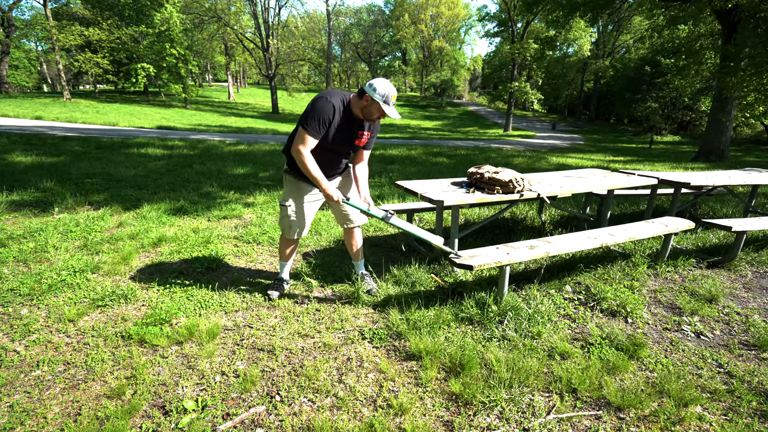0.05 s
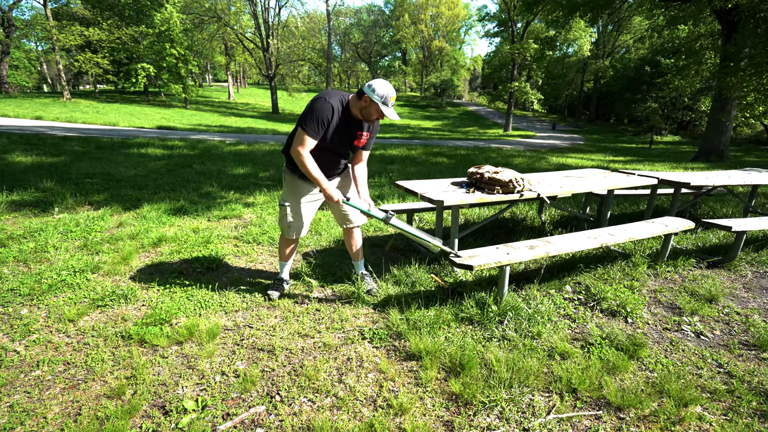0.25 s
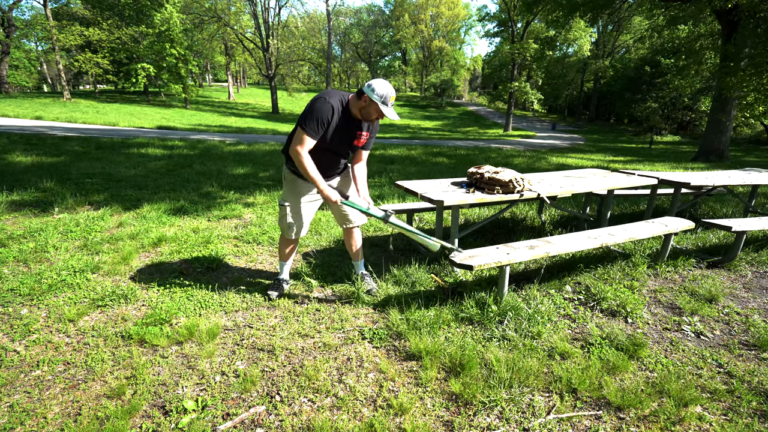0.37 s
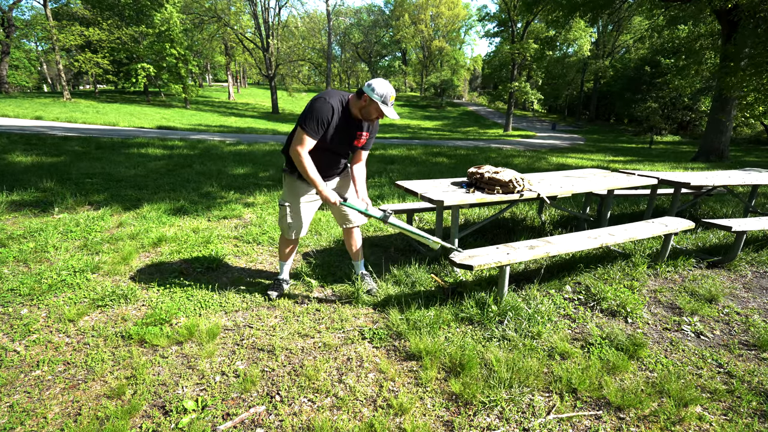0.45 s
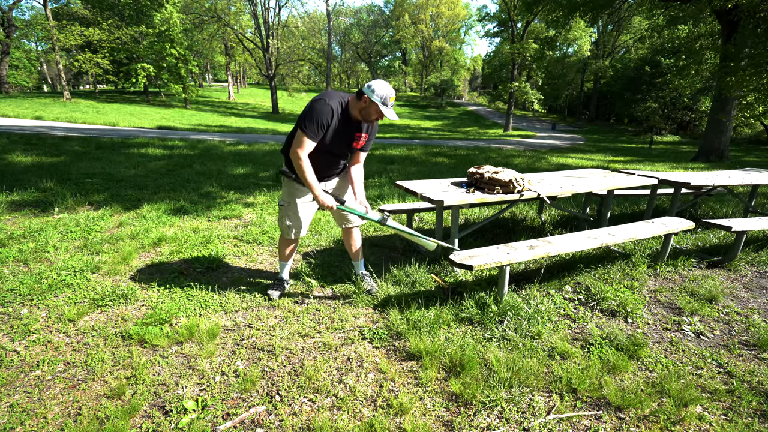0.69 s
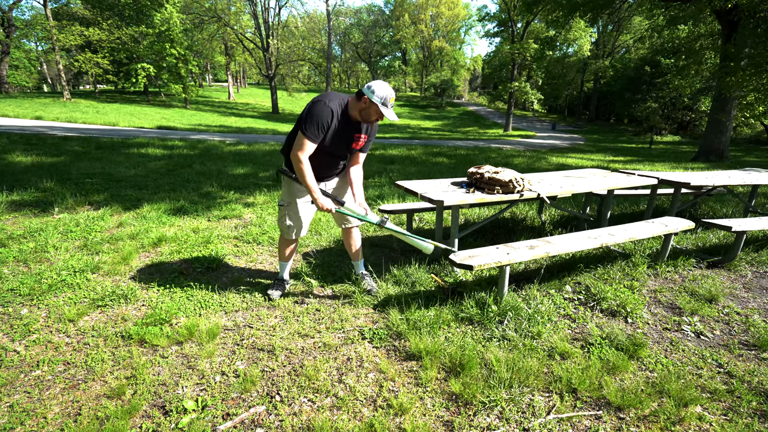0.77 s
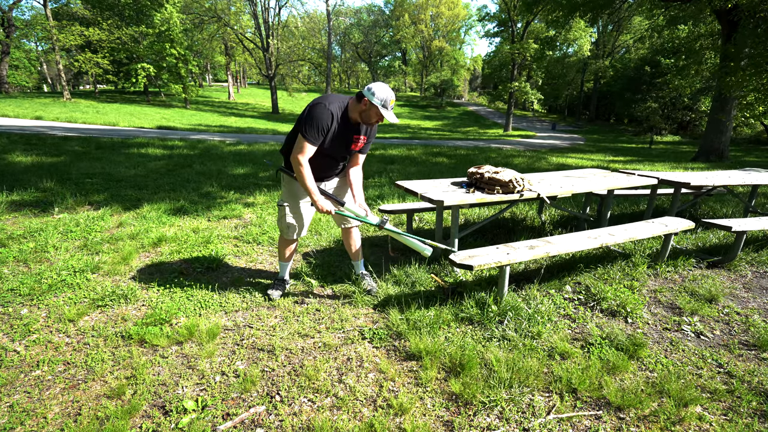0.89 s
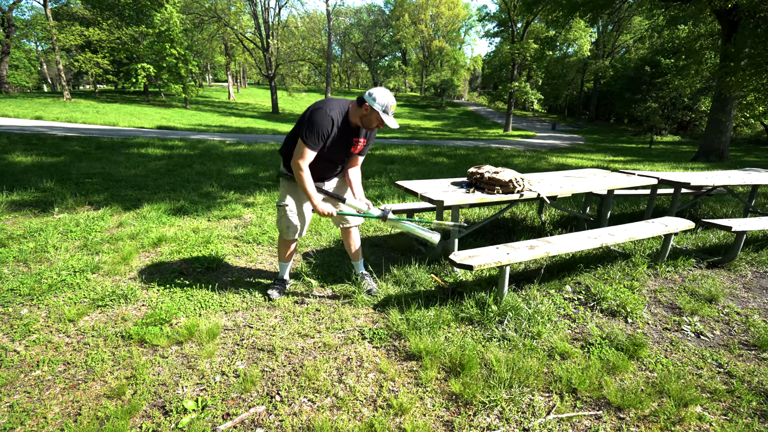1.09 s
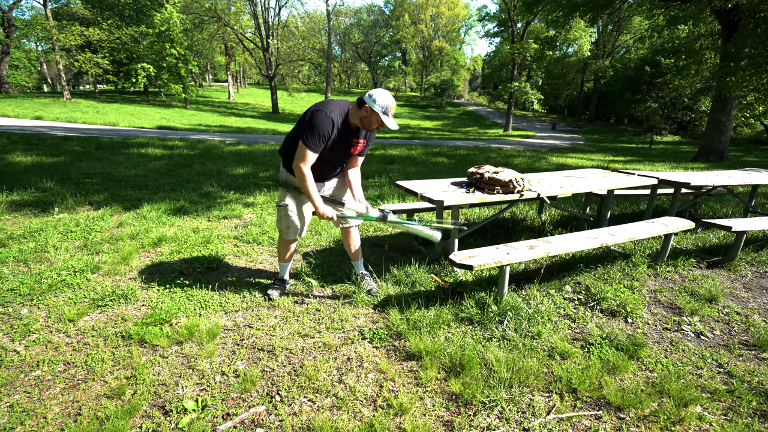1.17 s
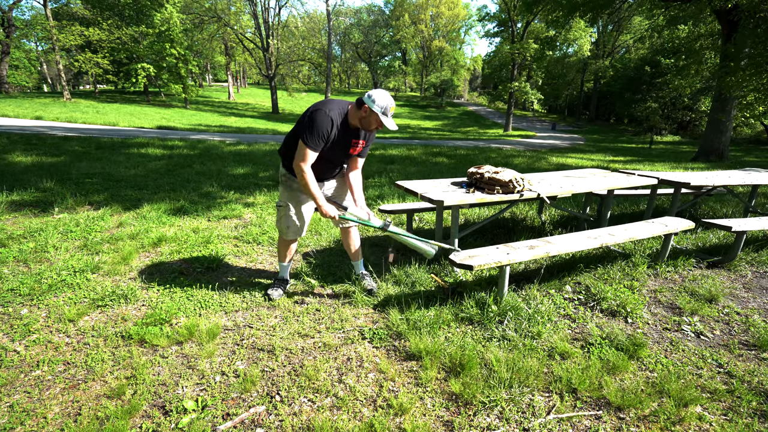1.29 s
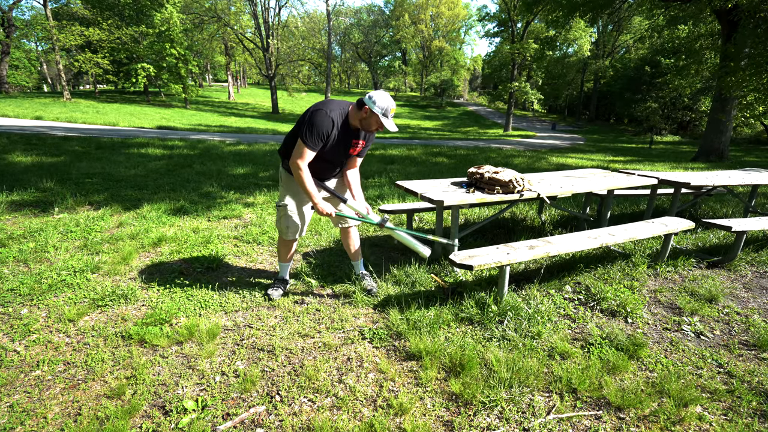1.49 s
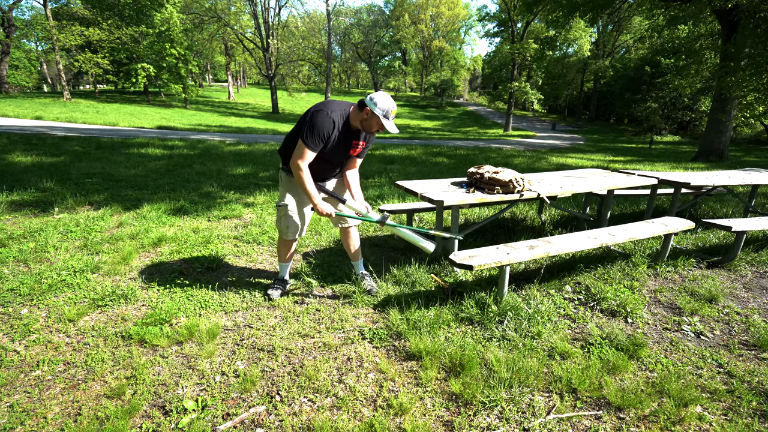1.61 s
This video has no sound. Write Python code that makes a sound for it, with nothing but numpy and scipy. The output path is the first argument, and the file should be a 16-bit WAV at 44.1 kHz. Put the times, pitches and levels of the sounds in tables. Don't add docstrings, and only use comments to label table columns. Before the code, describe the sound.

Woody, hollow knocks of a collapsing pole against a bench plank, with small ticks between, in a park

```python
import sys
import numpy as np
from scipy import signal
from scipy.fft import rfft, irfft
from scipy.io import wavfile

SR = 44100
rng = np.random.default_rng(int(sys.argv[2]) if len(sys.argv) > 2 else 0)


def makeup_ratio(level_db):
    decades = np.asarray(level_db, float) / 20
    return 10 ** decades


def to_wav(s):
    ch = np.atleast_2d(s).T
    pcm = np.round(np.clip(ch, -1, 1) * 32767)
    wavfile.write(sys.argv[1], SR, pcm.astype(np.int16))


N = 72765


def rms_one(x):
    return x / np.sqrt(np.mean(x ** 2) + 1e-20)


def at_hz(points, hz):
    table_hz, values = np.array(points).T
    return np.interp(np.log(hz), np.log(table_hz), values)


def since(s):
    return np.maximum(np.arange(N) / SR - s, 0)


def fall(t, t60):
    return (t > 0) * makeup_ratio(-60 * t / t60)


def noise():
    return rng.standard_normal(N)


def colour(x, spectrum, tilt_db=0):
    hz = np.maximum(np.arange(N // 2 + 1) * SR / N, 10)
    gain_db = at_hz(spectrum, hz) + tilt_db * np.log2(hz / 3000)
    return rms_one(irfft(rfft(x) * makeup_ratio(gain_db), N))


def band_pass(x, order, low_hz, high_hz):
    return signal.sosfilt(signal.butter(order, [low_hz, high_hz], "band", fs=SR, output="sos"), x)


def ring(clicks, hz, t60):
    r, w = makeup_ratio(-60 / (t60 * SR)), 2 * np.pi * hz / SR
    return signal.lfilter([0, np.sin(w)], [1, -2 * r * np.cos(w), r * r], clicks + 1e-18)


def soft_tone(s, db, hz, t60):
    t = since(s)
    return makeup_ratio(db) * (1 - np.exp(-t / 0.00063)) * fall(t, t60) * np.sin(2 * np.pi * hz * t)


def puffs(events, cycles, trim_db, wide):
    out, white = np.zeros(N), noise()
    for s, db, hz, t60 in events:
        tone = rms_one(ring(ring(white, hz, cycles / hz), hz, cycles / hz))
        out += makeup_ratio(db + trim_db) * fall(since(s), t60) * (tone + wide(white))
    return out


# frequency in Hz, level in dB.
PARK = [(20, -20), (45, -18), (100, -8.5), (180, -1.5), (330, -14), (720, -12), (2000, -28), (16000, -57.5)]
PARK_DB, HISS_DB = -52, -75
DRONE_HZ, DRONE_WIDTH_HZ, DRONE_DB = 95.3, 25.2, -48.5
GUST_DB, GUSTS_PER_S = 0.5, 2.8


def park():
    low_pass = signal.butter(2, GUSTS_PER_S, fs=SR, output="sos")
    slow = signal.sosfilt(low_pass, rng.standard_normal(N + SR))[SR:]
    drone = rms_one(ring(noise(), DRONE_HZ, 1 / DRONE_WIDTH_HZ)) * makeup_ratio(GUST_DB * rms_one(slow))
    return makeup_ratio(PARK_DB) * colour(noise(), PARK) + makeup_ratio(DRONE_DB) * drone + makeup_ratio(HISS_DB) * noise()


# start in seconds, peak level in dB, pitch in Hz, t60 in seconds.
TICKS = [(0.0363, -53.5, 8550, 0.062), (0.1415, -45.5, 4700, 0.037), (0.32, -42.5, 4490, 0.025),
         (0.4446, -41, 6110, 0.028), (0.454, -27.5, 3500, 0.025), (0.4664, -37, 3400, 0.021),
         (0.478, -28, 7960, 0.027), (0.7104, -51, 4290, 0.019), (0.7844, -48, 4660, 0.012),
         (0.817, -28.5, 5500, 0.016), (0.821, -39.5, 4740, 0.029), (0.8705, -44, 3760, 0.025),
         (0.8992, -38, 8040, 0.037), (0.933, -51, 3640, 0.013), (1.035, -47.5, 4450, 0.025),
         (1.085, -43, 8140, 0.029), (1.1786, -53, 9000, 0.036), (1.2027, -48.5, 7760, 0.03),
         (1.2165, -49.5, 7500, 0.022), (1.2251, -48, 6950, 0.026), (1.236, -47.5, 6920, 0.022),
         (1.3144, -55.5, 5280, 0.025), (1.337, -33, 5600, 0.02), (1.6383, -52, 3600, 0.03)]
# frequency in Hz, level in dB per Hz.
TICK_SPECTRUM = [(300, 1.5), (1500, 1), (4000, -8.5), (8500, -2.5), (10000, -14.5), (14000, -20),
                 (16000, -14)]
TICK_WIDE_DB = 1


def ticks():
    return puffs(TICKS, 11, -14, lambda white: makeup_ratio(TICK_WIDE_DB) * colour(white, TICK_SPECTRUM))


# start in seconds, plank, tube and crack levels in dB, plank swell in seconds.
KNOCKS = [
    (0.24, -7, -14.5, -19, 0.0072),
    (0.4811, -7, -14.5, -33, 0.0049),
    (.7480, -8.5, -15.5, -22.5, 0.0067),
    (1.2952, -9, -33.5, -45.5, 0.0055),
]
# frequency in Hz, level in dB, t60 in seconds.
TUBE = [(1027, 0.5, 0.037), (1330, 2.5, 0.0088), (1560, -13.5, 0.011), (1808, 0.5, 0.018),
        (2130, -2.5, 0.016), (2520, -11, 0.031), (2988, 0.5, 0.013), (3179, -3.5, 0.015),
        (3900, -21, 0.019), (4460, -9.5, 0.013), (5380, -8.5, 0.013), (5730, -18.5, 0.052),
        (7277, -20.5, 0.016), (8440, -26.5, 0.017)]
# frequency in Hz, lift in dB, width in octaves.
SECTION = [(1972, 10.5, 0.19), (3080, 5.5, 0.74), (3090, 8.5, 0.2), (1280, 5, .35)]
JOINT_DB = [
    [-1, 3.5, 0, -1.5, 2.5, -10.5, -1, 3, -1, -3, -1, -4, 8, -10],
    [0, 0, 0, 0.5, 0, 4, -1, -1.5, 1, 1.5, -3.5, -9, -9, -0.5],
    [-2.5, -1, 0, 1.5, 0.5, 1.5, -2.5, -5, 2, -2.5, -6.5, -6, 1, 6],
    [-13, 5.5, 0, -7, -1, -3, 0, 4, 1, -2, 0.5, -10, -4, -2],
]
SLAP_S = [0, .0008, .0029, .0046]
SLAP_DB = [
    [-3.5, -0.29, 0.83, -19],
    [-2, -1, -1.8, -14],
    [-0.5, -1.4, 0.1, -15],
    [-1.5, -2.2, 1, -17],
]
SLAP_PACE = [.97, 1.03, 1.06, 0.91]
TUBE_TILT_DB = [0.89, 4.1, 0.87, 4.4]
# level in dB, one a knock.
TREBLE_DB = [2, -3, 0.5, 0.5]
TREBLE_HZ = 3500
SLAP_DULL_DB = 1
MODE_SPREAD_DB = 3.5


def tube():
    out = np.zeros(N)
    spread = rng.standard_normal((len(KNOCKS), 4, len(TUBE)))
    knocks = np.array(KNOCKS)
    start_s, knock_db = knocks[:, [0]], knocks[:, [2]]
    tilt_db, treble_db = np.array(TUBE_TILT_DB)[:, None], np.array(TREBLE_DB)[:, None]
    top_hz, top_db, width = np.transpose(SECTION)[..., None]
    slap_at = ((start_s + np.outer(SLAP_PACE, SLAP_S)) * SR).astype(int)
    for k, (hz, mode_db, t60) in enumerate(TUBE):
        octaves = np.log2(hz / 2000)
        level_db = knock_db + mode_db - 8 + np.array(SLAP_DB) + np.array(JOINT_DB)[:, [k]]
        level_db = level_db + top_db * np.exp(-(np.log2(hz / top_hz) / width) ** 2)
        level_db = level_db + (tilt_db - SLAP_DULL_DB * np.arange(4)) * octaves
        level_db = level_db + (hz > TREBLE_HZ) * treble_db + MODE_SPREAD_DB * spread[..., k]
        clicks = np.zeros(N)
        clicks[slap_at] = (-1) ** k * makeup_ratio(level_db)
        out += ring(clicks, hz, t60)
    return out


# frequency in Hz, level in dB per Hz.
CRACK = [(1000, -7.5), (3000, -10.5), (5000, -26), (8000, -19), (11000, -30), (14000, -26.5),
         (16000, -39.5)]
# level in dB, one a knock.
SNAP_DB = [-23, -60.5, -30, -64.5]
CRACK_T60_S, SNAP_HZ, SNAP_T60_S = 0.031, 11100, 0.007


def crack():
    body = sum(makeup_ratio(row[3]) * fall(since(row[0]), CRACK_T60_S) for row in KNOCKS)
    snap = sum(makeup_ratio(db) * fall(since(row[0]), SNAP_T60_S) for row, db in zip(KNOCKS, SNAP_DB))
    return body * colour(noise(), CRACK) + snap * band_pass(noise(), 4, SNAP_HZ, 15000)


# start in seconds, level in dB, frequency in Hz, t60 in seconds.
RINGS = [(0.24, -22.5, 3180, 0.028), (0.2412, -36, 3860, .025), (0.2425, -44, 7835, .02),
         (0.24, -37, 8100, .02), (0.2405, -35, 2300, 0.016), (0.4822, -22, 2590, 0.031),
         (0.4822, -25, 1830, 0.019), (0.49, -33, 4400, .02), (0.7488, -26, 2300, 0.024),
         (0.76, -25.5, 2600, 0.02), (0.75, -33, 3900, 0.019), (1.298, -31, 1655, 0.047),
         (1.298, -35, 1600, 0.066), (1.297, -42, 2800, .02), (0.2645, -23.5, 720, 0.076),
         (0.5135, -21.5, 690, 0.054), (0.7785, -21.5, 720, .06), (1.329, -24.5, 720, 0.058),
         (0.486, -25, 1002, 0.076), (0.4818, -17.5, 3120, .012), (0.2402, -18.5, 1900, 0.017),
         (0.766, -28, 1250, 0.11)]


def rings():
    return sum(soft_tone(*row) for row in RINGS)


# frequency in Hz, level in dB per Hz.
TAIL = [(200, 1), (400, 16.5), (700, 14.5), (1300, 11), (2500, -5), (5000, -21), (9000, -29.5),
        (15000, -66.5)]
# frequency in Hz, t60 in seconds.
TAIL_T60 = [(300, 0.21), (700, 0.16), (2000, 0.17), (8000, 0.22)]
# change in dB, one a knock.
TAIL_LOW_DB = [0.5, 0, -0.4, -4]
# change in dB, one a knock.
TAIL_GAP_DB = [0.5, -0.1, -0.4, -10.5]
TAIL_DB, WEIGHT_HZ, TAIL_GAP_HZ = -10, 480, 1000


def scatter():
    out, source = np.zeros(N), colour(noise(), TAIL)
    edges = 150 * 2 ** np.arange(0, 7, .5)
    for low, high in zip(edges, edges[1:]):
        t60 = at_hz(TAIL_T60, np.sqrt(low * high))
        envelope = np.zeros(N)
        for (s, db, *_), low_db, gap_db in zip(KNOCKS, TAIL_LOW_DB, TAIL_GAP_DB):
            level_db = db + low_db * (low < WEIGHT_HZ) + gap_db * (low < TAIL_GAP_HZ < high)
            t = since(s)
            envelope += makeup_ratio(level_db) * fall(t, t60) * (1 - np.exp(-t / 0.0024))
        out += band_pass(source, 2, low, high) * envelope
    return makeup_ratio(TAIL_DB) * out


LINGER_DB, LINGER_T60_S = -41, 1.08


def far_trees():
    wash = sum(makeup_ratio(row[2]) * fall(since(row[0]), LINGER_T60_S) for row in KNOCKS)
    return makeup_ratio(LINGER_DB) * wash * colour(noise(), CRACK)


# frequency in Hz, level in dB, t60 and lag in seconds.
THUDS = [
    (627, -11.5, 0.046, 0.00143),
    (610, -9.5, 0.039, 0.0013),
    (618, -14, 0.048, 0.0012),
    (1227, -20, 0.067, 0.00194),
]


def thuds():
    return -sum(soft_tone(knock[0] + lag, db, hz, t60) for knock, (hz, db, t60, lag) in zip(KNOCKS, THUDS))


# frequency in Hz, level in dB, t60 in seconds.
PLANK = [(211, -12.5, 0.074), (394.7, -14, 0.14), (445.5, -6.5, 0.056), (498, -23, 0.047),
         (598.7, -13, 0.15), (628.4, 0, 0.064), (707.3, 5.5, 0.052), (749.3, 3.5, 0.073),
         (809, -23.5, 0.19), (937, -29, 0.067), (1181.5, -4.5, 0.062), (1262, -12.5, 0.086),
         (1444, -8.5, 0.034), (1617, -19, 0.056)]
SPOT_DB = [
    [0.5, -0.6, 2.5, 0.11, 1.5, -0.6, 0.52, 0.1, 0.1, 9, -1, 0.1, 0.1, 0.1],
    [-0.8, 0.54, -2, 0.1, -2, 1.6, -0.31, 0.1, 0.1, -2, 0.1, 0.1, 0.1, 0.1],
    [1.5, 0.6, 4, 0.1, 1, 0.8, 0.73, 0.1, 0.1, -4, 0.61, 0.1, 0.1, 0.1],
    [-0.5, -1.8, -32, 21.4, -2.5, -20, -1.8, 3.8, 2.4, -25, 0.1, 1.4, 1.5, 7.2],
]
# level in dB, one a knock.
WEIGHT_DB = [-0.5, 1, -0.5, 1.5]
# lag in seconds, one a knock.
LAG_S = [0.003494, 0.0034, 0.00349, 0.0055]
# delay in seconds, one a knock.
DAMP_S = [0.0153, .016, 0.016, .019]
# change in dB, one a knock.
DAMP_DB = [-5.5, -2, -3, -1.5]
DAMP_EDGE_S = .001
SWELL_HZ, SWELL_POWER = 652, 0.56


def plank():
    out = np.zeros(N)
    spot_db = np.array(SPOT_DB) + np.outer(WEIGHT_DB, np.array(PLANK)[:, 0] < WEIGHT_HZ)
    for knock, own_db, lag, damp_s, damp_db in zip(KNOCKS, spot_db, LAG_S, DAMP_S, DAMP_DB):
        s, db, _, _, swell = knock
        t = since(s + lag)
        choke = makeup_ratio(damp_db * (1 + np.tanh((t - damp_s) / DAMP_EDGE_S)) / 2)
        for k, (hz, mode_db, t60) in enumerate(PLANK):
            rise = (1 - np.exp(-t / swell * (hz / SWELL_HZ) ** SWELL_POWER)) ** 2
            level = (-1) ** k * makeup_ratio(db + mode_db + own_db[k])
            out += level * rise * choke * fall(t, t60) * np.sin(2 * np.pi * hz * t)
    return -out


# start and length in seconds, level in dB, tilt in dB per octave.
SLIDES = [(0.428, 0.036, -52.5, 0), (.445, 0.016, -36.5, -3.5), (0.4603, 0.0063, -39.5, 1.5),
          (0.476, 0.012, -30, 1), (0.494, 0.025, -47, 4.5), (0.687, 0.012, -48.5, -0.2),
          (0.703, 0.0032, -34.5, -2.5), (0.71, 0.026, -51, -0.5), (0.764, 0.0096, -33.5, 0),
          (0.77, 0.035, -46, -1.5), (0.854, 0.036, -63, 2), (1.17, 0.11, -67, -10),
          (0.262, .012, -57.5, 10), (1.294, 0.012, -37.5, -1), (1.308, 0.024, -69, 17.5),
          (0.812, 0.027, -56, -.5), (1.079, 0.0075, -52.5, -1.5), (0.582, 0.03, -59, -2)]
# frequency in Hz, level in dB.
SLIDE_SPECTRUM = [(180, -11.5), (400, 1), (800, -7), (1340, -5), (3130, -15), (8000, -24.5), (10000, -31.5),
                  (16000, -61)]
GRAINS_PER_S, GRAIN_SPREAD_DB, GRAIN_BED, SLIDE_EDGE_S = 3500, 3.5, .3, .003


def slides():
    sizes = makeup_ratio(GRAIN_SPREAD_DB * np.minimum(rng.exponential(1, N), 4)) * rng.choice([-1, 1], N)
    grains = sizes * (rng.random(N) < GRAINS_PER_S / SR) + GRAIN_BED * noise()
    out = np.zeros(N)
    for s, length, db, tilt_db in SLIDES:
        rise = 1 - np.exp(-since(s) / SLIDE_EDGE_S)
        stroke = rise * np.exp(-since(s + length) / (2 * SLIDE_EDGE_S))
        out += makeup_ratio(db) * stroke * colour(grains, SLIDE_SPECTRUM, tilt_db)
    return out


TAIL_RING_DB, TAIL_RING_T60_S = -37.5, 0.34


def lingering_plank():
    tones = rms_one(sum(makeup_ratio(db) * ring(noise(), hz, 0.18) for hz, db, _ in PLANK[4:13]))
    lasting = sum(makeup_ratio(row[1]) * fall(since(row[0] + 0.06), TAIL_RING_T60_S) for row in KNOCKS)
    return makeup_ratio(TAIL_RING_DB) * lasting * tones


# start in seconds, peak level in
# dB, pitch in Hz, t60 in seconds.
GRIT = [(0.4475, -41, 1300, .02), (0.4505, -42, 1870, .015), (0.4533, -34.5, 1300, .02),
        (0.4628, -27, 1384, 0.044), (0.4635, -33.5, 3091, 0.024), (0.4675, -30, 3100, 0.024),
        (0.4705, -30, 2200, 0.022), (0.6935, -42, 2770, .04), (0.7045, -34.5, 1500, .025),
        (0.7063, -31.5, 3500, 0.018), (0.7075, -47, 5900, 0.011), (0.715, -46, 1920, .02),
        (0.7175, -52, 3200, 0.013), (0.785, -52, 12500, .01), (1.0855, -49, 13200, 0.022),
        (1.087, -49.5, 4220, 0.021), (1.296, -21.5, 523, .03), (0.705, -56.5, 13100, 0.035)]
GRIT_CYCLES, GRIT_WIDE_DB = 17.4, -18


def grit():
    return puffs(GRIT, GRIT_CYCLES, -7.5, lambda white: makeup_ratio(GRIT_WIDE_DB) * colour(white, TICK_SPECTRUM))


LOW_CUT_HZ, TOP_HZ = 150, 15900


def scene():
    knocks = tube() + crack() + rings() + thuds() + plank()
    answers = scatter() + far_trees() + lingering_plank()
    pole = knocks + answers + ticks() + slides() + grit()
    low_cut = signal.butter(2, LOW_CUT_HZ, "high", fs=SR, output="sos")
    return (park() + signal.sosfilt(low_cut, pole))[None]


def top_cut(x):
    return signal.sosfilt(signal.butter(12, 16510, fs=SR, output="sos"), x)


def record(dry):
    mix = signal.sosfilt(signal.butter(8, TOP_HZ, fs=SR, output="sos"), dry)
    return top_cut(mix)


dry = scene()
out = record(dry)
to_wav(out)
```